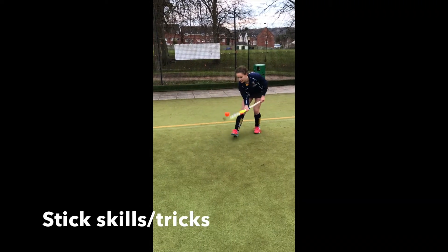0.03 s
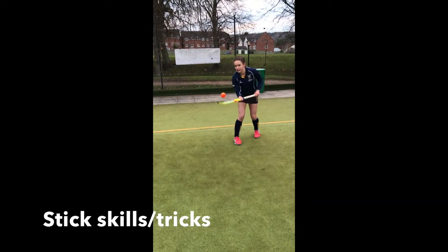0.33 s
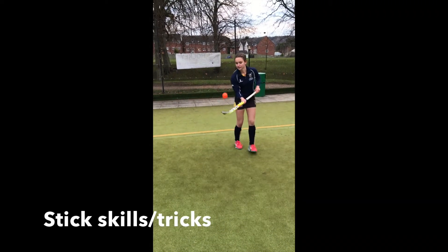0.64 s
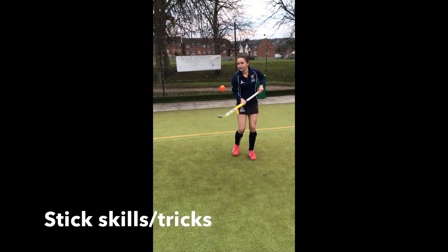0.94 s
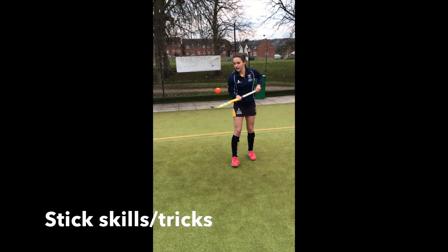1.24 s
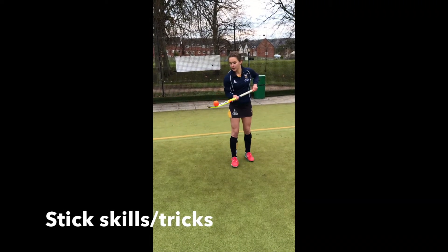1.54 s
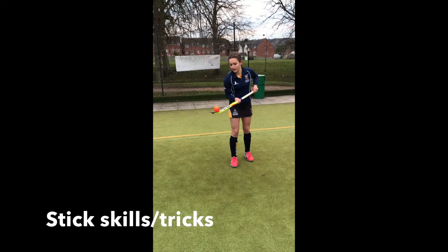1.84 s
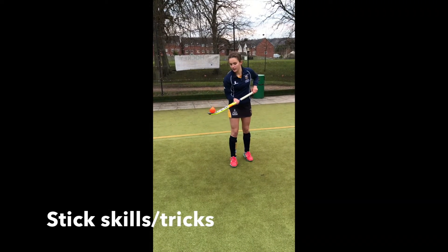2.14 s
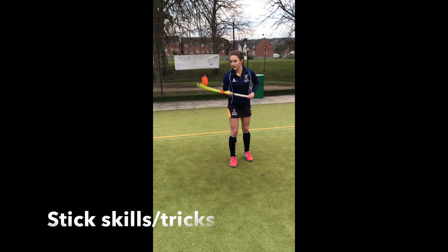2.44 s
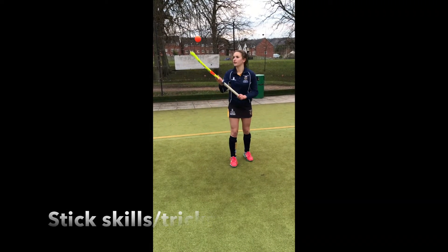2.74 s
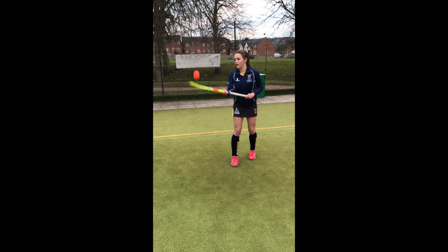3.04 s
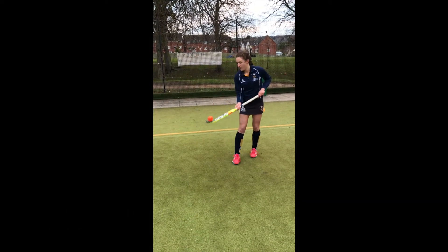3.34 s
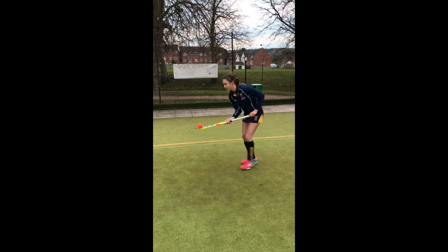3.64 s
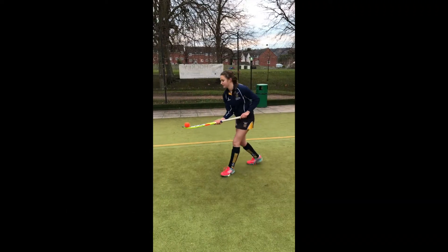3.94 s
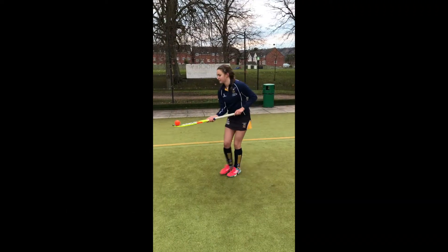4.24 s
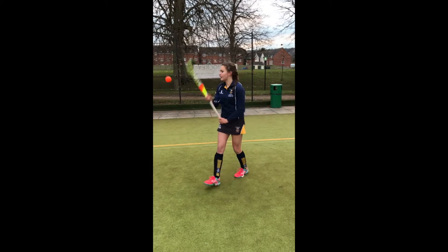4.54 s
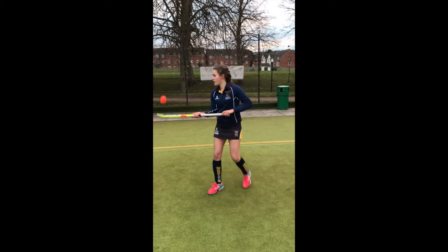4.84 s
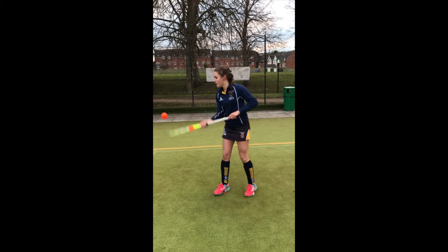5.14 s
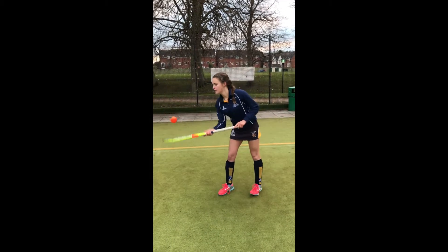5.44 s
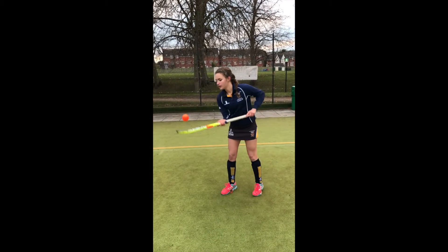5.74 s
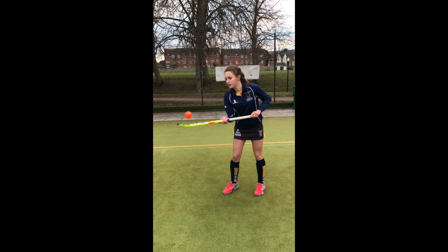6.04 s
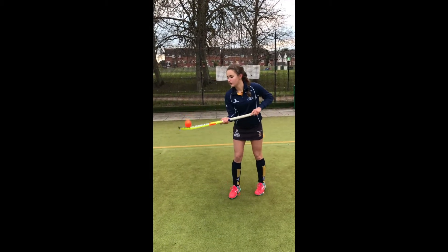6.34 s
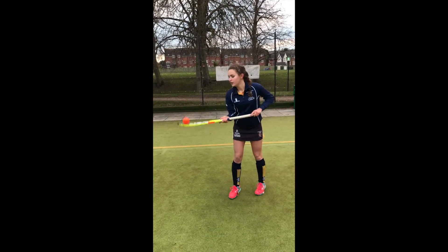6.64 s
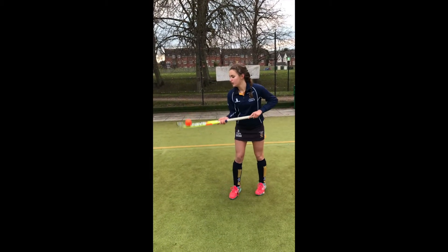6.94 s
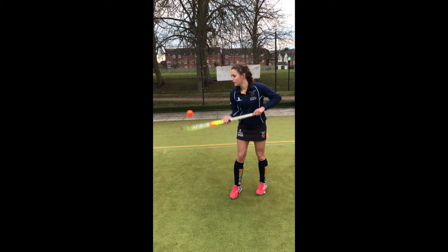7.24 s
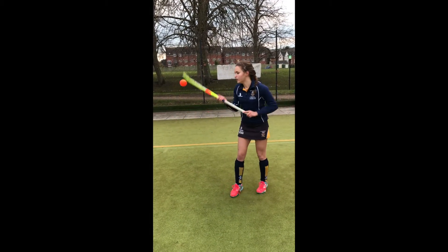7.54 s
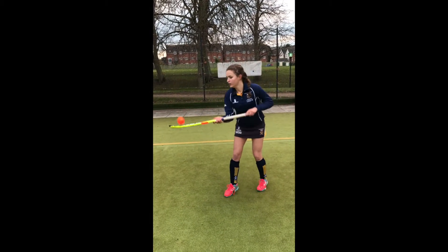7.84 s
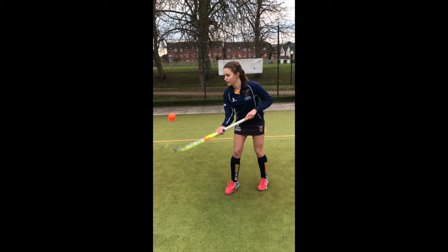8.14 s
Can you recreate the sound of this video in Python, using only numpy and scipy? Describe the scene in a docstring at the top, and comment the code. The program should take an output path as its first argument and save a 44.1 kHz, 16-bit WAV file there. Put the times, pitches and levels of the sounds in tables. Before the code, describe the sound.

A hard ball bounces with sharp taps on a hockey stick outdoors, with soft steps and faint wind and distant traffic.

```python
"""On an artificial pitch, a few metres away, a hard plastic ball is kept bouncing on a hockey stick.
Each impact excites the damped modes of ball and blade. The sound arrives directly, then by reflection
from the turf, an onlooker and the boards, and last as the reverberation of trees and houses.
Soft steps, scuffs, ticks of kit, one squeak and a rustle lie over a light wind rumble,
the murmur of distant traffic and a faint hiss."""
import sys
import numpy as np
from scipy import signal
from scipy.fft import rfft, irfft, next_fast_len
from scipy.io import wavfile
from scipy.ndimage import map_coordinates

SR = 44100
rng = np.random.default_rng(int(sys.argv[2]) if len(sys.argv) > 2 else 0)


def digitize_waveform(pressure):
    """Quantize a signal to 16-bit integers and store it at the path in sys.argv[1].

    Rows of a 2-D input are taken as channels; values are limited to [-1, 1].
    """
    field = np.atleast_2d(pressure).T
    bounded = np.clip(field, -1, 1)
    quanta = np.round(bounded * 32767).astype(np.int16)
    wavfile.write(sys.argv[1], SR, quanta)


N = 366030

# Impacts of ball on blade:
# start_s, relative_level_db, body_db, bite_db, brightness_db, favoured_hz, turf_lag_s, facing_db
IMPACTS = [(0.1526, -26.5, 6.5, -5, -1.5, 1305, 0.0027, 7), (0.469, -30, 5, 2.5, 2, 1370, 0.0031, 5.5),
           (0.8023, -22.5, 0, 0.5, -2.5, 1960, 0.0028, 5.5), (1.2004, -26, -1.5, 4, 1.5, 1387, 0.0028, 3.5),
           (1.5403, -31, 1, 7, 1, 2520, 0.0029, 2), (3.22, -28, 2, 4.5, -8, 2280, 0.0025, -3),
           (5.0064, -24, -1.5, 3.5, 4, 1700, 0.0021, 0.5), (5.369, -19.5, -3, 5.5, 4, 1020.0, 0.0022, -1),
           (5.7285, -22, 3, 4.5, 2, 1820, 0.0022, -5.5), (5.7412, -42, 15, 3.0, -0.5, 1500.0, 0.0028, -14),
           (6.0605, -20, -5.5, 5, 1, 1500.0, 0.0026, -9), (6.4029, -24, 2, 12.5, 5.5, 3430, 0.0027, -6),
           (6.6928, -24.5, 7, 7.5, 7.5, 1920, 0.0028, -6), (7.033, -22.0, -2, 5, 1, 1350.0, 0.0028, -6),
           (7.0459, -36.5, 8.5, -8, -1.5, 1350.0, 0.0019, -7),
           (7.3723, -20.5, 5, -0.5, 3.5, 1400, 0.003, -8), (7.8266, -38, -26, 6, -6.5, 1500.0, 0.003, -21),
           (7.9341, -18.5, 3.5, -1, 2, 1310, 0.0035, -8)]
# Where body, neutral middle, bite, brightness and top octave lie: frequency_hz
TONE_BANDS = [600, 1350, 2100, 4300, 10000]
# Joint modes of ball and stick: pitch_hz, relative_level_db, t60_s
STICK_MODES = [(288, -26, 0.014), (507, -21, 0.025), (551, -12.5, 0.016), (657, -11, 0.0086),
               (835, -14, 0.029), (1020, -2.5, 0.01), (1206, -6, 0.021), (1350, -4, 0.022),
               (1500, 2, 0.0066), (1720, -4, 0.012), (1973, -1.5, .012), (2285, -8.5, 0.0077),
               (2617, -4, 0.015), (3487, -3.5, 0.013), (3505, -10.5, 0.0047), (3835, -2, 0.0065),
               (4450, -3, 0.006), (4405, -8.5, 0.018), (6080, -11.5, 0.0049), (6620, -14, 0.0095)]
# Spectra of an impact: frequency_hz, gain_db
CONTACT_SPECTRUM = [(200, -40), (1000, -11.5), (4000, 12.5), (9000, 7.5), (10500, 1), (13000, 8.5),
                    (16000, -6)]  # first instant of contact
SHELL_SPECTRUM = [(200, -13), (900, -11), (2000, 0), (4000, -13), (6300, -2.5), (7700, -21), (9000, -6),
                  (10500, -16.5), (13000, -18), (16000, -21)]  # crack of the ball
UNDERSIDE_SPECTRUM = [(200, -22), (1100, 0.5), (2400, -3.5), (15000, -9.5)]  # crack of the blade

# Echoes from around the pitch: lag_after_nearest_s, relative_level_db, spread_s
BOARD_ECHOES = [(0, -19.5, 0.00077), (.003, -26, .0006), (.0128, -17, .0004), (0.032, -22.5, .005),
                (.037, -20.5, 0.006)]
# The nearest board's delay, growing as the player moves out: time_s, lag_s
NEAREST_BOARD_LAG = [(0, .038), (1.5, .0405), (6, .044)]
# Reverberation time of trees and houses: frequency_hz, t60_s
REVERB_DECAY = [(200, 0.25), (1300, 1), (4000, 0.84), (12000, 0.63)]
# Responses of the reflecting paths: frequency_hz, gain_db
TURF_RESPONSE = [(200, 7), (1200, 8.5), (3000, 2.5), (6000, -1), (15000, -17.5)]
ONLOOKER_RESPONSE = [(200, -5), (1200, 0), (4000, -1.5), (15000, -10)]
BOARD_RESPONSE = [(200, 2), (700, -1.5), (1350, 2), (1900, -2.5), (4000, -11.5), (6500, -13),
                  (10000, -17.5), (16000, -17)]
REVERB_RESPONSE = [(200, -20.5), (600, -22), (1100, 7.5), (2200, -3.5), (3000, -10), (4000, -6),
                   (5000, -15), (6200, -15.5), (10000, -23.5), (16000, -34.5)]

# Shoes landing on turf: start_s, relative_level_db, t60_s
FOOTFALLS = [(1.727, -44, 0.067), (3.68, -53, 0.056), (4.043, -42, 0.058), (4.641, -39, 0.061),
             (4.96, -55.5, 0.29), (5.948, -37, 0.041), (6.11, -49.5, 0.62), (6.603, -38.5, 0.041)]
# Shoes dragging over turf: start_s, level_db, length_s
SOLE_DRAGS = [(3.561, -67, .035), (3.663, -60, 0.037), (4.191, -60.5, 0.068), (4.65, -60, 0.13),
              (4.944, -51, 0.11), (5.953, -67, 0.044), (8.185, -60.5, 0.23)]
# Light contacts of grip and kit: start_s, relative_level_db, centre_hz, t60_s
KIT_TICKS = [(1.615, -51, 6900, 0.031), (3.042, -59.5, 9080, .06), (3.4402, -43.5, 5770, 0.013),
             (4.04, -49, 2030, 0.031), (4.1, -61, 13000, 0.04), (4.645, -46, 7000, 0.0075),
             (4.831, -45, 9000, 0.0091), (6.2638, -48.5, 5900, 0.056), (8.046, -45, 4000, 0.023)]
# Strength of the breeze: time_s, relative_level_db
BREEZE = [(0, -51.5), (.42, -54.5), (.65, -47.5), (1.2, -54), (1.6, -52), (2.0, -48), (2.5, -53),
          (4.0, -55), (4.5, -58), (6.2, -54), (8.3, -53.5)]
# Spells of raised hiss during the runs of taps: start_s, end_s, level_db
RAISED_HISS = [(0.458, 1.63, -69.5), (4.927, 8.3, -70)]
# Spectra of the noise sources: frequency_hz, gain_db
SOLE_SPECTRUM = [(40, -15.5), (120, 2), (220, 9), (380, -2.5), (600, -18), (1500, -20), (5000, -38),
                 (15000, -57)]
SCUFF_SPECTRUM = [(300, 10), (900, -4.5), (2500, 1.5), (5000, -7.5), (10000, -13.5), (15600, -14),
                  (16200, -30)]
CLOTH_SPECTRUM = [(1500, -41), (3700, -2), (4600, 4.5), (6500, 1.5), (8500, -1.5), (10500, -8), (13000, -8),
                  (15700, -5), (16200, -29)]
WIND_SPECTRUM = [(20, -34.5), (32, -19.5), (45, 3), (70, 1), (110, -4), (200, -12.5), (330, -20.5),
                 (600, -41), (2000, -65)]
TRAFFIC_SPECTRUM = [(60, -9), (200, 3.5), (450, -4.5), (700, -2.5), (1000, 0), (1400, -3.5), (2000, -8.5),
                    (3000, -18.5), (5000, -29.5), (10000, -36)]
HISS_SPECTRUM = [(500, -13), (2000, 7), (3800, 8.5), (5000, 1.5), (6200, 4.5), (8000, -0.5), (10500, -1),
                 (13000, 1.5), (15600, -7.5), (16200, -22.5)]


def ball_taps(gain_db=-10, reverb_db=-24, onlooker_db=-8, onlooker_lag_s=0.0016, top_growth=1.24):
    """Multipath propagation: each impact is heard directly, then as delayed, filtered reflections."""
    out, t = np.zeros(N), np.arange(SR // 10) / SR
    for start_s, level_db, body_db, bite_db, bright_db, favoured_hz, turf_lag_s, facing_db in IMPACTS:
        blow = unit_rms(impact(t, favoured_hz))
        near = blow.copy()
        add(near, turf_lag_s, colour(blade_underside(t, blow), TURF_RESPONSE))
        off_onlooker = amp(onlooker_db) * colour(near, ONLOOKER_RESPONSE)
        add(near, onlooker_lag_s * rng.uniform(0.76, 1.3), off_onlooker)
        heard = amp(reverb_db) * np.linalg.norm(blow) * reverberation()
        add(heard, 0, unit_rms(near))
        add(heard, 0, signal.fftconvolve(blow, board_echoes(start_s, facing_db)))
        # contact point and grip set the tone; a harder contact lifts the top octave most
        tone = list(zip(TONE_BANDS, [body_db, 0, bite_db, bright_db, top_growth * bright_db]))
        add(out, start_s, amp(level_db + gain_db) * colour(heard, tone))
        add(out, start_s, shaft_hum(t, level_db + bite_db + max(bright_db, 0)))
    return out


def impact(t, favoured_hz, boost_db=5, log_width=0.095, detune=0.026, crack_db=-4, edge_db=-7):
    """Modal excitation: a sharp edge and the shell's crack, with a ring shaped by the contact point."""
    hz, level_db, t60_s = np.transpose(STICK_MODES)
    scatter_db, shift = rng.standard_normal((2, len(hz)))
    nearness = np.exp(-(np.log(hz / favoured_hz) / log_width) ** 2)
    level_db = level_db + scatter_db + boost_db * nearness
    polarity = (-1) ** np.arange(len(hz))  # neighbouring modes swing opposite ways
    waves = np.sin(2 * np.pi * (hz * (1 + detune * shift))[:, None] * t)
    ring = (polarity * amp(level_db)) @ (waves * decay(t, t60_s[:, None]))
    crack = colour(rng.standard_normal(len(t)) * decay(t, t60_s=0.016), SHELL_SPECTRUM)
    edge = colour(1.0 * (t == 0), CONTACT_SPECTRUM)
    return unit_rms(ring) + amp(crack_db) * unit_rms(crack) + amp(edge_db) * unit_rms(edge)


def blade_underside(t, blow, shared=0.5):
    """Partial coherence: the underside follows the top face in part and adds a crack of its own."""
    crack = colour(rng.standard_normal(len(t)) * decay(t, t60_s=0.016), UNDERSIDE_SPECTRUM)
    return unit_rms(shared * blow + (1 - shared) * unit_rms(crack))


def shaft_hum(t, drive_db, gain_db=-24.5, pitch_hz=670):
    """Free vibration: the shaft's slow bending mode hums on after an off-centre blow."""
    return amp(drive_db + gain_db) * np.sin(2 * np.pi * pitch_hz * t) * decay(t, t60_s=0.064)


def board_echoes(time_s, facing_db, diffuse=0.78, specular=0.84, far_share=0.32):
    """Specular and diffuse reflection: each board returns a slap, smeared by its posts and mesh."""
    t = np.arange(SR // 5) / SR
    nearest_s = np.interp(time_s, *np.transpose(NEAREST_BOARD_LAG))
    response = np.zeros(len(t))
    for k, (later_s, level_db, spread_s) in enumerate(BOARD_ECHOES):
        smear = rng.standard_normal(len(t)) * np.exp(-t / spread_s)
        slap = diffuse * smear / np.linalg.norm(smear) + specular * (t == 0)
        # the nearest board and its bounce off the turf gain most when the blade faces them
        share = 1 if k < 2 else far_share
        add(response, nearest_s + later_s, amp(level_db + share * facing_db) * slap)
    return colour(response, BOARD_RESPONSE)


def reverberation(rise_s=0.028):
    """Scattering by trees and houses: a tail of unit energy, each frequency decaying at its own rate."""
    t = np.arange(SR) / SR
    hz, frame_s, spectra = signal.stft(rng.standard_normal(SR), SR, nperseg=256)
    damped = spectra * decay(frame_s, at_frequency(REVERB_DECAY, hz)[:, None])
    tail = signal.istft(damped, SR, nperseg=256)[1][:SR]
    tail = colour(tail * (1 - np.exp(-t / rise_s)), REVERB_RESPONSE)
    return tail / np.linalg.norm(tail)


def steps(gain_db=3, rise_s=0.0014):
    """Cushioned impact: rubber soles on turf give thuds of mostly low frequencies."""
    out, t = np.zeros(N), np.arange(SR // 4) / SR
    for start_s, level_db, t60_s in FOOTFALLS:
        thud = unit_rms(colour(rng.standard_normal(len(t)), SOLE_SPECTRUM))
        envelope = decay(t, t60_s) * (1 - np.exp(-t / rise_s))
        add(out, start_s, amp(level_db + gain_db) * envelope * thud)
    return out


def scuffs(grain_db=3):
    """Sliding friction: soles drag through the turf's fibres in gritty swells."""
    out = np.zeros(N)
    for start_s, level_db, length_s in SOLE_DRAGS:
        swell = np.hanning(round(length_s * SR))
        grit, grain_size = rng.standard_normal((2, SR // 4))[:, :len(swell)]
        scrape = unit_rms(colour(grit * amp(grain_db * grain_size), SCUFF_SPECTRUM))
        add(out, start_s, amp(level_db) * swell * scrape)
    return out


def ticks(gain_db=-3, skirt_db=-14):
    """Damped transients: light contacts of grip and kit give brief, bright bands of noise."""
    out, t = np.zeros(N), np.arange(SR // 5) / SR
    for start_s, level_db, hz, t60_s in KIT_TICKS:
        band = [(hz / 10, 3 * skirt_db), (hz / 2, skirt_db), (hz, 0), (hz * 2, skirt_db)]
        grain = unit_rms(colour(rng.standard_normal(len(t)), band))
        add(out, start_s, amp(level_db + gain_db) * grain * decay(t, t60_s))
    return out


def squeak(start_s=6.261, level_db=-42, pitch_hz=3270, length_s=0.014, octave_db=-12):
    """A harmonic tone burst: a fundamental and its octave make one very short squeak."""
    out, swell = np.zeros(N), np.hanning(round(length_s * SR))
    phase = 2 * np.pi * pitch_hz * np.arange(len(swell)) / SR
    tone = np.sin(phase) + amp(octave_db) * np.sin(2 * phase)
    add(out, start_s, amp(level_db) * swell * tone)
    return out


def rustle(start_s=0.585, level_db=-61, attack_s=0.064, hold_s=0.075, t60_s=0.8):
    """Friction noise, as of sliding cloth: a soft swish swells, holds and dies away."""
    t = np.arange(N) / SR - start_s
    swell = np.clip(t / attack_s, 0, 1) * decay(np.maximum(t - attack_s - hold_s, 0), t60_s)
    return amp(level_db + waver_db(depth_db=0.37, rate_hz=37.5)) * swell * noise(CLOTH_SPECTRUM)


def kit_whisper(level_db=-84):
    """Friction noise: moving kit gives a faint, fluttering whisper throughout."""
    return amp(level_db + waver_db(depth_db=4, rate_hz=19)) * noise(CLOTH_SPECTRUM)


def wind(gain_db=-1):
    """Turbulence: a light breeze makes a low rumble that rises and falls with the gusts."""
    breeze_db = np.interp(np.arange(N) / SR, *np.transpose(BREEZE))
    return amp(breeze_db + gain_db + waver_db(depth_db=2.5, rate_hz=11)) * noise(WIND_SPECTRUM)


def traffic(level_db=-60.5):
    """Incoherent summation: distant vehicles merge into a nearly steady murmur."""
    return amp(level_db + waver_db(depth_db=0.99, rate_hz=4.24)) * noise(TRAFFIC_SPECTRUM)


def hiss(rest_db=-80.5, rise_s=0.016, fall_s=0.11):
    """Amplitude modulation: a faint hiss steps up for the runs of taps and sinks between them."""
    t, level_db = np.arange(N) / SR, np.full(N, rest_db)
    for start_s, end_s, raised_db in RAISED_HISS:
        ramps = np.minimum((t - start_s) / rise_s, 1 - (t - end_s) / fall_s)
        level_db += (raised_db - rest_db) * np.clip(ramps, 0, 1)
    return amp(level_db) * noise(HISS_SPECTRUM)


def amp(db):
    """The decibel law: 20 dB is a tenfold amplitude."""
    return 10 ** (np.asarray(db) / 20)


def unit_rms(x):
    """Normalisation to a mean power of 1."""
    return x / np.sqrt(np.mean(x ** 2) + 1e-20)


def at_frequency(points, hz):
    """Interpolation of (frequency_hz, value) points on a logarithmic frequency axis."""
    known_hz, values = np.transpose(points)
    return np.interp(np.log(hz + 1), np.log(known_hz + 1), values)


def waver_db(depth_db, rate_hz):
    """Random modulation: a smooth level curve through rate_hz Gaussian values a second."""
    knots = rng.standard_normal(int(N * rate_hz / SR) + 4)
    return depth_db * map_coordinates(knots, [np.arange(N) * rate_hz / SR])


def decay(t, t60_s):
    """Exponential damping by 60 dB in t60_s."""
    return np.exp(-np.log(1000) * t / t60_s)


def add(track, start_s, sound):
    """Superposition of a sound on a track, in place."""
    part = track[max(round(start_s * SR), 0):][:len(sound)]
    part += sound[:len(part)]


def colour(x, points, size=2048):
    """Minimum-phase filtering by (frequency_hz, gain_db) points."""
    gain = amp(at_frequency(points, np.fft.rfftfreq(size, 1 / SR)))
    cepstrum = irfft(np.log(gain))
    cepstrum[1:size // 2] *= 2  # folding onto positive time makes the filter causal
    cepstrum[size // 2 + 1:] = 0
    response = irfft(np.exp(rfft(cepstrum)))
    return signal.fftconvolve(x, response)[:len(x)]


def noise(points):
    """Spectral shaping of white noise by (frequency_hz, gain_db) points, at rms 1."""
    size = next_fast_len(N)
    gain = amp(at_frequency(points, np.fft.rfftfreq(size, 1 / SR)))
    return unit_rms(irfft(rfft(rng.standard_normal(size)) * gain)[:N])


def scene():
    """Linear superposition: all sources sum at one listening point."""
    player = ball_taps() + ticks() + squeak() + steps() + scuffs() + rustle() + kit_whisper()
    return (player + wind() + traffic() + hiss())[None]


def record(dry):
    """Band limiting: a raised-cosine slope removes the highest treble."""
    limit_hz, slope_hz = 17000, 900
    size = next_fast_len(N + SR // 2)
    ramp = np.clip((limit_hz - np.fft.rfftfreq(size, 1 / SR)) / slope_hz, 0, 1)
    return irfft(rfft(dry, size) * np.sin(np.pi / 2 * ramp) ** 2, size)[..., :N]


dry = scene()
out = record(dry)
digitize_waveform(out)
```